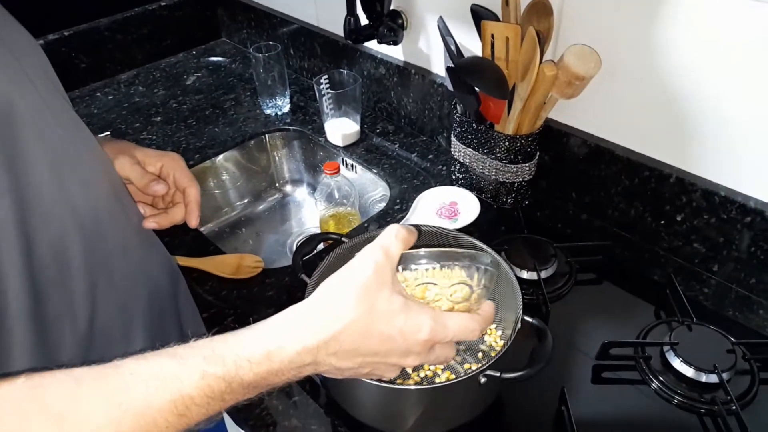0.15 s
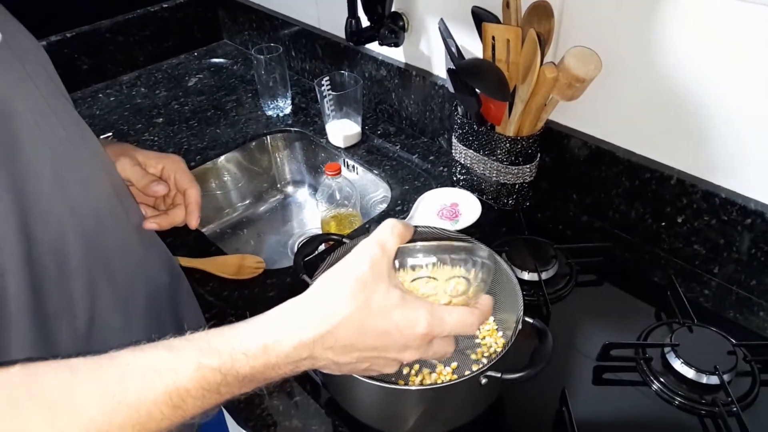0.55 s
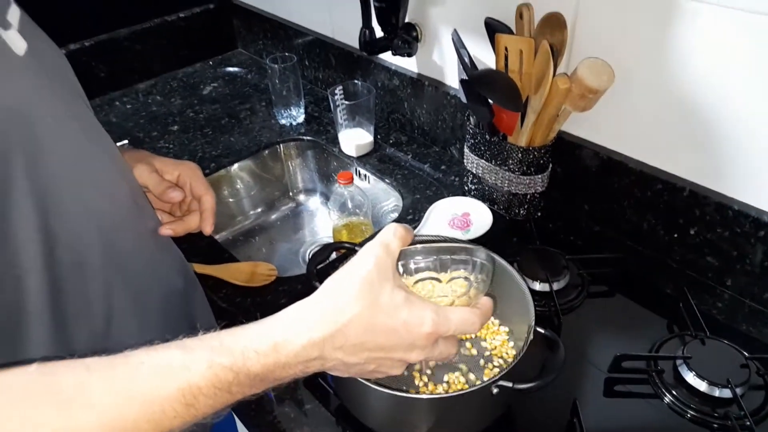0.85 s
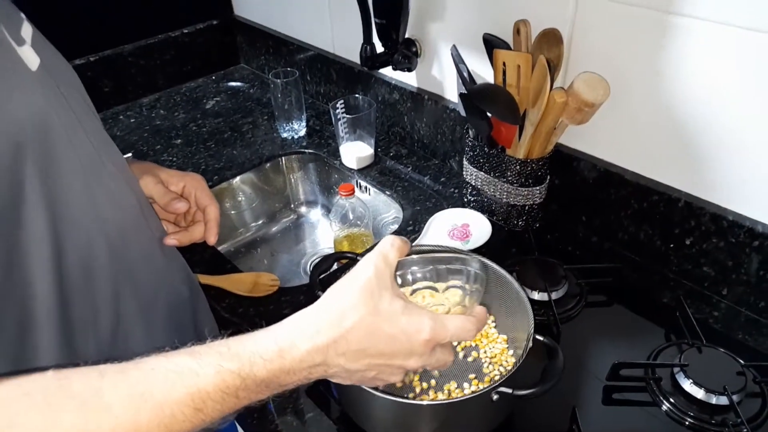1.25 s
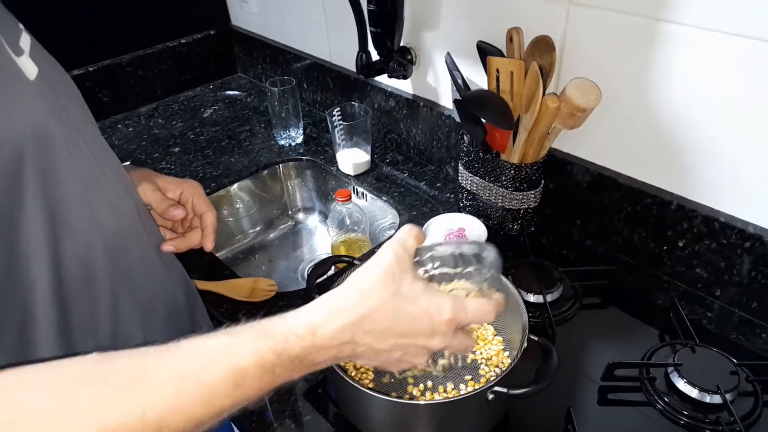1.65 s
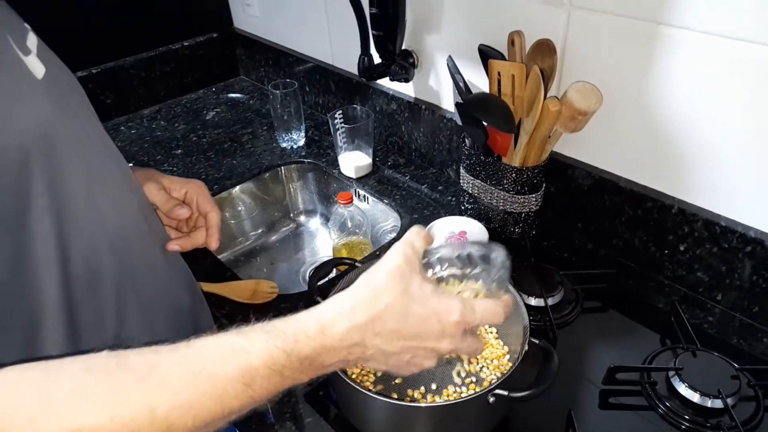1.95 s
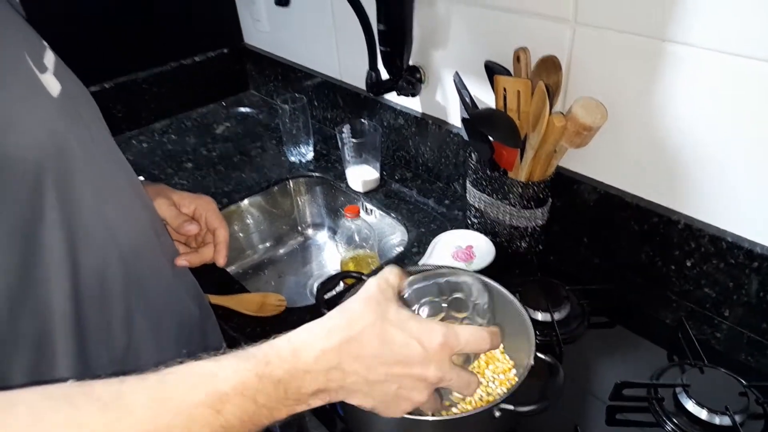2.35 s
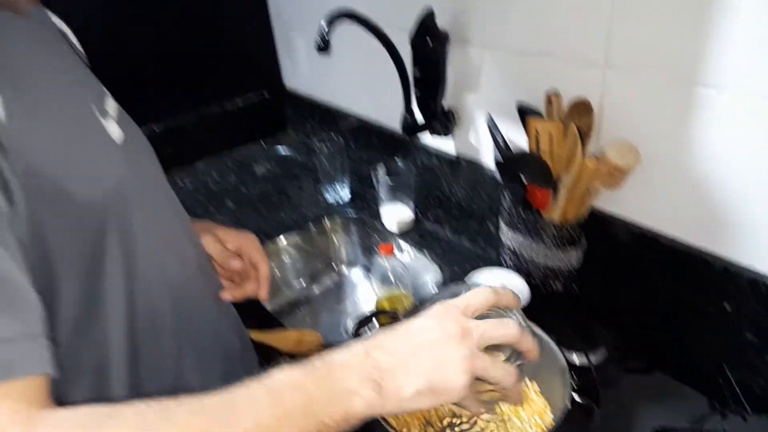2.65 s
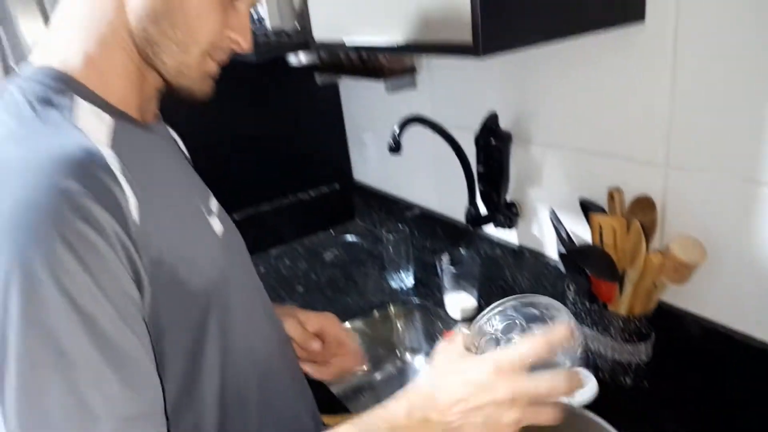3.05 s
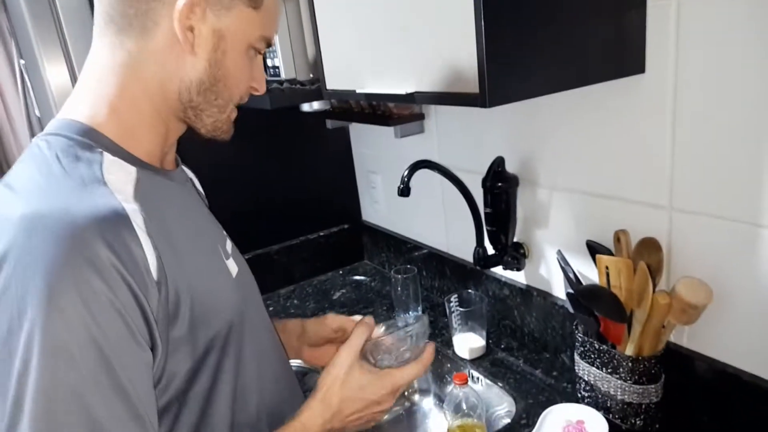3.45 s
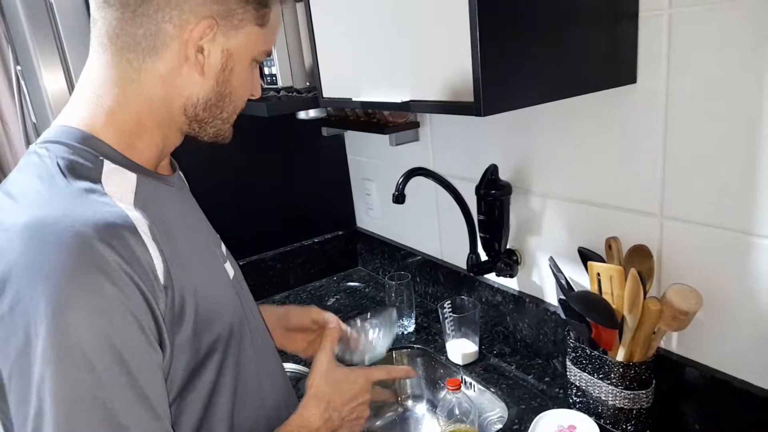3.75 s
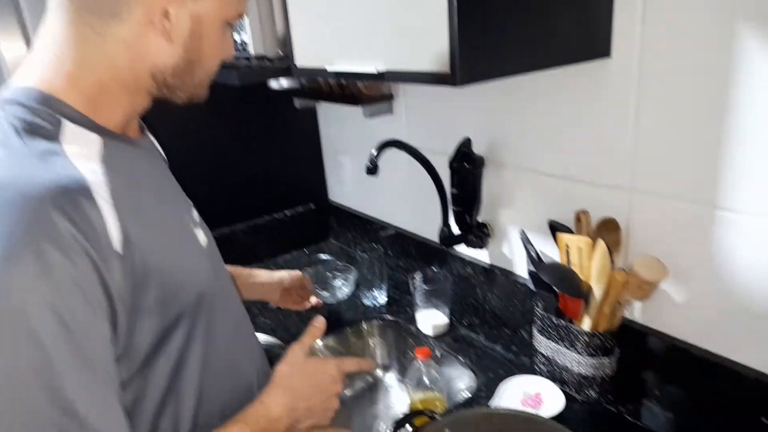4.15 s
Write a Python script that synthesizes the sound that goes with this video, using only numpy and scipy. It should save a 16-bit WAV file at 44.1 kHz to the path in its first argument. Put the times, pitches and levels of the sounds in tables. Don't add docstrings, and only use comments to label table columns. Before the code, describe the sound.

Dry corn kernels pour from a glass bowl into a steel pot, rattling and ringing loudly, then soft glassy knocks over faint hiss.

```python
import sys
import numpy as np
from scipy import signal
from scipy.fft import rfft, irfft
from scipy.io import wavfile

SR = 44100
rng = np.random.default_rng(int(sys.argv[2]) if len(sys.argv) > 2 else 0)


def put_to_file(sound):
    columns = np.atleast_2d(sound).T
    safe = np.clip(columns, -1, 1)
    whole_steps = np.round(safe * 32767)
    wavfile.write(sys.argv[1], SR, whole_steps.astype(np.int16))


def rack_gain(trim_db):
    fader = np.asarray(trim_db, float)
    return 10 ** (fader / 20)


N = 190280
T = np.arange(N) / SR
BED_DB = -2 * T


def unit(x):
    return x / np.sqrt(np.mean(x ** 2) + 1e-30)


def colour(x, table):
    hz, db = np.transpose(table)
    f = np.maximum(np.fft.rfftfreq(x.shape[-1], 1 / SR), 1)
    gain = rack_gain(np.interp(np.log(f), np.log(hz), db))
    return irfft(rfft(x) * gain, x.shape[-1])


def fall(seconds, t60):
    return np.exp(-np.log(1000) * seconds / max(t60, 1e-3))


def through(x, response):
    return signal.fftconvolve(np.atleast_2d(x), response, axes=1)[:, :N]


def ring(modes, scatter_db=0., detune=0., turn=0.):
    t, out = T[:SR // 2], 0
    for (hz, db, t60, lead), (a, b, c) in zip(modes, rng.standard_normal((len(modes), 3))):
        phase = np.array([[.5], [-.5]]) * (lead + turn * c)
        gain = rack_gain(db + scatter_db * a) / np.sqrt(t60)
        wave = np.sin(2 * np.pi * hz * (1 + detune * b) * t + phase)
        out = out + gain * fall(t, t60) * wave
    return out


def hits(per_second, spread_db):
    chance = rng.random((3, N))
    hardness_db = spread_db * np.minimum(-np.log(1 - chance[1]), 3.5)
    size = rack_gain(hardness_db) * np.sign(chance[2] - .5)
    return unit(size * (chance[0] < per_second / SR))


def bowl_tip():
    start_s, rise_s = 2.26, 0.25
    return np.clip((T - start_s) / rise_s, 0, 1)


# (time [s], level [dB])
STREAM = [(0.0, -24), (0.04, -24), (0.66, -28), (0.68, -25.5), (0.87, -29.5), (0.88, -24), (1.45, -27.5),
          (1.52, -22.5), (1.58, -35.5), (1.71, -22.5), (1.77, -31), (2.15, -22.5), (2.21, -29),
          (2.34, -22.5), (2.41, -31.5), (2.43, -24.5), (2.72, -24), (3.0, -53.5)]
# (time [s], peak level [dB], weight on floor and grate [dB])
CLUMPS = [(0.176, -15.5, 4), (0.195, -12, 2), (0.275, -9, 0), (0.327, -24, 3), (0.3635, -12.5, -5),
          (0.416, -27.5, 6), (0.455, -12, 0), (0.5167, -9, -2), (0.546, -12, -4), (0.6653, -9.5, -5.5),
          (0.681, -12, 8), (0.7467, -15.5, 8), (0.7898, -24, -6), (0.874, -17.5, -1.5), (0.956, -18.5, 4.5),
          (1.02, -18, -1.5), (1.1656, -19.5, -8), (1.181, -29, 3), (1.2246, -17, -8), (1.254, -13, 3),
          (1.363, -12.5, -1), (1.457, -10, -7), (1.4738, -13.5, 5), (1.632, -9.5, 0), (1.6852, -15.5, 3),
          (1.8253, -13, 10), (1.9733, -34, 0), (2.2307, -15, -2), (2.422, -11, -6), (2.47, -13.5, 10)]


def landings():
    scatter_t60_s, leader_db = 0.049, 2.5
    s, stream_db = np.transpose(STREAM)
    flow = rack_gain(np.interp(T, s, stream_db) - 2) * np.clip((s[-1] - T) / 0.039, 0, 1)
    leaders, weight = np.zeros(N), np.ones(N)
    for start, db, weight_db in CLUMPS:
        after = (T >= start) * fall(np.maximum(T - start, 0), scatter_t60_s)
        flow = flow + rack_gain(db - 15) * after
        weight = weight * rack_gain(weight_db * after ** .3)
        leaders[int(start * SR)] = rack_gain(db + leader_db)
    spots = [hits(per_second=240.0, spread_db=2.0) * flow for _ in range(5)]
    return spots + [leaders], weight


# (frequency [Hz], level [dB per Hz])
TICK = [(250, -15.5), (400, -11), (1250, -5), (1450, -12), (2600, -6), (3700, -8), (4600, -4.5), (5900, -3),
        (6950, 3.5), (8000, -3.5), (9000, -3.5), (12500, 6), (15500, 4.5), (16500, -31)]


def kernel_ticks(force):
    dull_from_s, dull_db_per_s = 2.72, -35
    t = T[:SR // 10]
    energy = fall(t, 0.0027) ** 2 + rack_gain(-15.5) * fall(t, 0.08) ** 2
    power = through(force ** 2, energy[None] / energy.sum())
    spray = np.sqrt(np.maximum(power, 0)) * rng.standard_normal((2, N))
    ticks = colour(spray, TICK) * rack_gain(-2.5)
    top = colour(ticks, [(7000, -34), (11000, 0.5)])
    return ticks + top * (rack_gain(dull_db_per_s * np.maximum(T - dull_from_s, 0)) - 1)


# (frequency [Hz], level [dB], t60 [s], left phase lead [rad])
WALL = [(502, -8.5, 0.43, 0.44), (588, -4.5, 0.32, 1.78), (643, -6.5, 0.33, 2.52), (705.5, -8, 0.098, 0.3),
        (849, -5.5, 0.073, 0.49), (908.6, -10, 0.081, 1.04), (1027, -18, 0.15, 0.51),
        (1146, -18, 0.082, 0.41), (1193.6, -3, 0.098, 2.04), (1261, -7.5, 0.32, 1.7)]
# (frequency [Hz], level [dB], t60 [s], left phase lead [rad])
RIM = [(1754, -6.5, 0.11, 1.4), (1920, -12, 0.19, 0.49), (2174, -2, 0.11, 1.5), (2450, -15, 0.33, 4.9),
       (2910, 0.5, 0.26, 2.1), (3610, -38, 0.13, 1.4), (4534, 3.5, 0.14, 1.9), (4930, 7, 0.029, 4.5),
       (6810, 11, 0.077, 1.9), (7100, 10.5, 0.067, 7.3), (7300, -18, 0.04, 1.4)]


def pot_wall(spots):
    wall_db = -18 + 4.5 * bowl_tip()
    out = 0
    for spot in spots:
        out = out + through(spot * rack_gain(wall_db - 42.0),
                            ring(WALL, scatter_db=4.5, detune=0.011, turn=1.0))
        out = out + through(spot * rack_gain(BED_DB - 65.5),
                            ring(RIM, scatter_db=7.0, detune=0.0067, turn=3.47))
    return out


# (frequency [Hz], level [dB], t60 [s], left phase lead [rad])
FLOOR = [(293, -10, 0.13, .2), (353.8, -1, 0.35, .1), (358, -12, 0.12, .1)]
# (frequency [Hz], level [dB], t60 [s], left phase lead [rad])
BARE_FLOOR = [(439.3, 2, 0.21, 0.26), (463, -1.5, 0.06, .3)]


def pot_floor(push):
    floor_db = -18.5 + 2 * T - 8 * bowl_tip()
    lasting = through(push * rack_gain(floor_db - 45.5), ring(FLOOR))
    bare = through(push * rack_gain(floor_db + 3.7 * BED_DB - 43), ring(BARE_FLOOR))
    return lasting + bare


# (frequency [Hz], level [dB], t60 [s], left phase lead [rad])
GRATE = [(63.5, -4, 0.082, 0.58), (80, -3, 0.09, 0.85), (100.3, -2.5, 0.097, 0.83), (126, -7, 0.062, 0.92)]


def stove_grate(spots, weight):
    grate_db = -17.5 - 1.5 * T
    out = 0
    for half in (spots[:3], spots[3:]):
        push = sum(half) * weight * rack_gain(grate_db - 43.0)
        out = out + through(push, ring(GRATE, scatter_db=1.5, detune=0.024, turn=0.84))
    return out


# (frequency [Hz], level [dB])
STOVE = [(25, -14), (50, -1), (130, 0.5), (200, -0.5), (260, -8), (330, 1.5)]


def pour():
    spots, weight = landings()
    force = sum(spots)
    steel = pot_wall(spots) + pot_floor(force * weight)
    return colour(kernel_ticks(force) + steel + stove_grate(spots, weight), STOVE)


# (frequency [Hz], t60 [s])
KITCHEN_T60 = [(100, 0.7), (1000, 0.54), (5000, 0.33), (14000, 0.11)]


def kitchen(dry):
    t, tail = T[:int(.8 * SR)], 0
    hz, t60 = np.transpose(KITCHEN_T60)
    for centre in 63.3 * 2. ** np.arange(9):
        octave = [(centre / 2, -40), (centre, 0), (centre * 2, -40)]
        band = unit(colour(rng.standard_normal((2, len(t))), octave))
        band_t60 = np.interp(np.log(centre), np.log(hz), t60)
        tail = tail + band * np.sqrt(centre) * fall(t, band_t60)
    tail = tail * np.minimum(t / 0.0092, 1)
    return through(dry, tail / np.sqrt(np.sum(tail ** 2) / 2))


# (frequency [Hz], level [dB per Hz])
HUM = [(18, -32.5), (30, -9), (76, 6.5), (185, -3.5), (301, 1.5), (974, -5.5), (1240, -3.5), (1620, -7),
       (1810, -5.5), (2210, -7), (6000, -14.5), (7800, -39), (13200, -120)]
# (frequency [Hz], width [Hz], level against the hum [dB])
WHINE = [(1197, 63, -10), (1798, 47, -12.5), (2410, 53, -14.5)]


def hum_and_whine(swell_s):
    mid, side = rng.standard_normal((2, N))
    side = colour(side, [(100, -6), (400, -6.5), (1200, 0.0)])
    hum = unit(colour(np.array([mid + side, mid - side]), HUM))
    for hz, width, db in WHINE:
        around = [(hz - 3 * width, -50), (hz, 0), (hz + 3 * width, -50)]
        hum = hum + rack_gain(db) * unit(colour(rng.standard_normal((2, N)), around))
    return hum * rack_gain(-67.5 + 12 * swell_s + 9.0)


# (frequency [Hz], level [dB per Hz])
SIZZLE = [(1760, -25), (3000, 3.5), (3510, -0.5), (5500, -1.5), (7060, 7), (8440, -4.5), (11600, 6),
          (15100, 5.5), (16200, -9), (16500, -37)]
# (time [s], rise [dB])
FLARES = [(3.0, 10), (3.14, 5), (3.255, 0), (3.328, 0), (3.44, 6), (3.675, 3), (3.754, 5), (3.781, 9),
          (4.079, 5.5), (4.239, 3.5), (4.289, 7)]


def pan_sizzle(swell_s):
    flare_fade_s = 0.032
    flare_db = 0
    for s, db in FLARES:
        flare_db = flare_db + db * (T >= s) * np.exp(-np.maximum(T - s, 0) / flare_fade_s)
    burst = rng.standard_normal((2, 200)) * fall(T[:200], 0.0021)
    spit = through(hits(per_second=980.0, spread_db=8.0), burst)
    sizzle = unit(colour(rng.standard_normal((2, N)) + .5 * unit(spit), SIZZLE))
    return sizzle * rack_gain(-72.5 + 16 * swell_s + flare_db + 13.0)


def quiet():
    swell_s = np.maximum(T - 3.82, 0)
    return hum_and_whine(swell_s) + pan_sizzle(swell_s)


# (time [s], peak level [dB], ring [Hz], click against the peak [dB])
KNOCKS = [
    (3.179, -41.5, 1790, -23),
    (3.487, -33.5, 1250, -9),
    (3.555, -45, 1280, -17),
    (3.7, -48, 1130, -14),
    (3.801, -43, 1270, -12),
    (4.078, -37, 1340, -8),
    (4.21, -43, 1250, -13),
    (4.239, -42, 1190, -4),
    (4.288, -33.5, 1170, -8),
]


def knocks():
    out, t = np.zeros((2, N + SR)), T[:SR // 8]
    click_band = [(1200, -30), (2200, -2), (4500, 0), (7000, -30)]
    for start, db, hz, click_db in KNOCKS:
        pair = np.sin(2 * np.pi * hz * t) + 0.6 * np.sin(2 * np.pi * 1.2 * hz * t)
        pair = pair * fall(t, 0.05) * np.minimum(t / 0.0016, 1)
        thud = 0.42 * np.sin(2 * np.pi * 430 * t) * fall(t, 0.021)
        click = unit(colour(rng.standard_normal((2, len(t))), click_band)) * fall(t, 0.05)
        tick = unit(colour(rng.standard_normal((2, len(t))), SIZZLE)) * fall(t, 0.025)
        knock = pair + thud + rack_gain(click_db) * (click + rack_gain(-3) * tick)
        first = int(start * SR)
        out[:, first:first + len(t)] += rack_gain(db - 10.0) * knock
    return out[:, :N]


def scene():
    near = pour() + knocks()
    return near + rack_gain(-11.5) * kitchen(near) + quiet()


def roll_off(x):
    return signal.sosfilt(signal.butter(12, 17070, fs=SR, output="sos"), x)


def record(dry):
    top_hz = 15950
    left = colour(dry[0], [(40, -11.5), (300, 1.0), (3000, 0.6), (5000, 0), (8000, -2.0), (13000, -2.0)])
    both = np.array([left, dry[1]])
    mix = colour(both, [(top_hz, 0), (top_hz + 250, -38), (top_hz + 1200, -60)])
    return roll_off(mix)


dry = scene()
out = record(dry)
put_to_file(out)
```